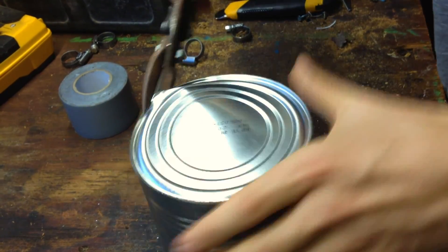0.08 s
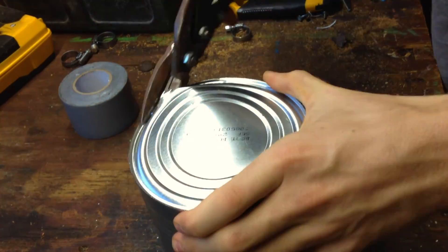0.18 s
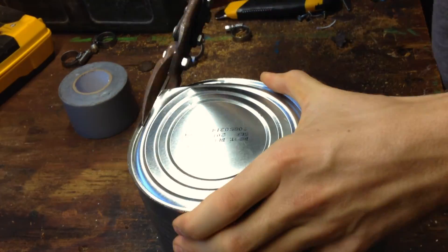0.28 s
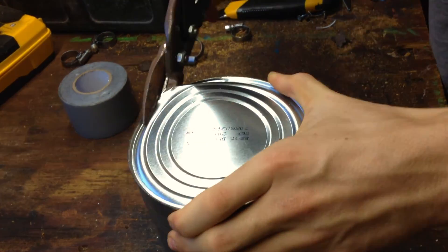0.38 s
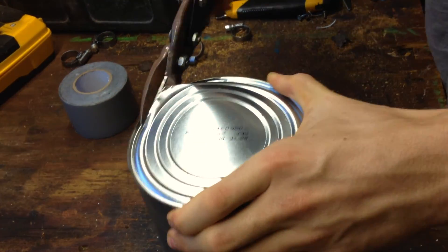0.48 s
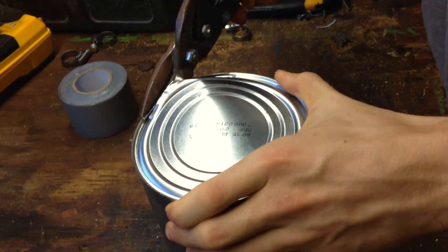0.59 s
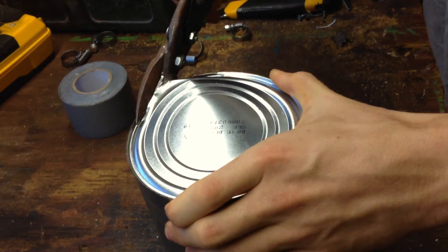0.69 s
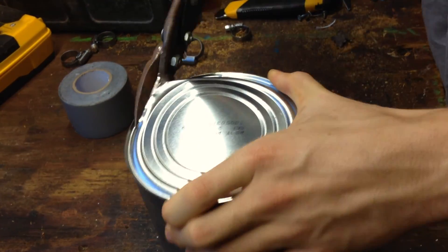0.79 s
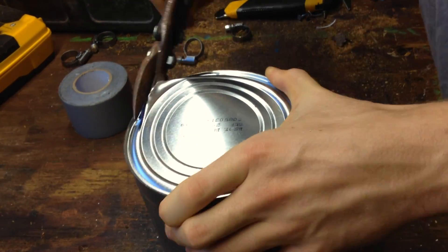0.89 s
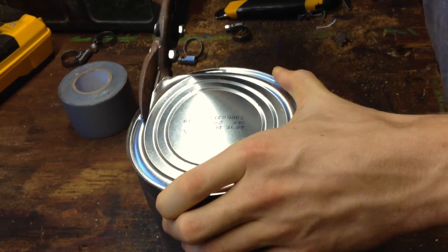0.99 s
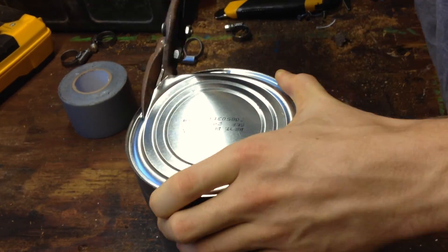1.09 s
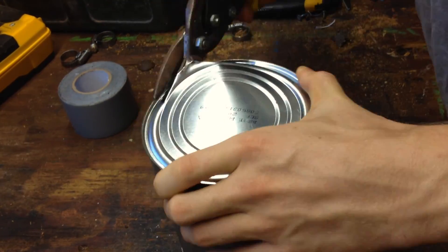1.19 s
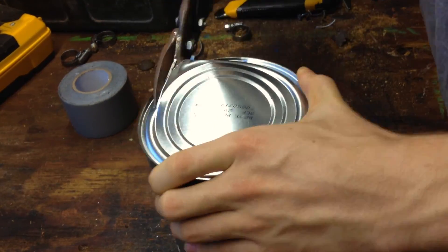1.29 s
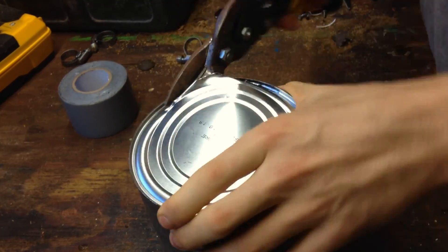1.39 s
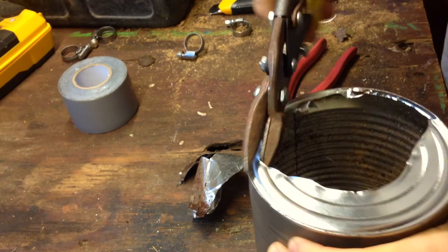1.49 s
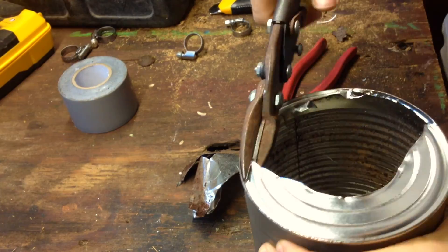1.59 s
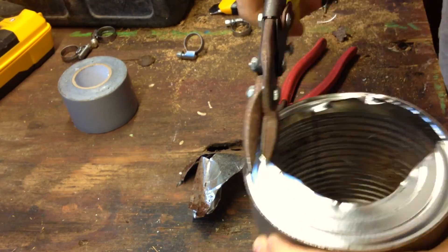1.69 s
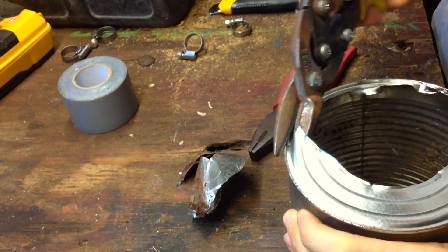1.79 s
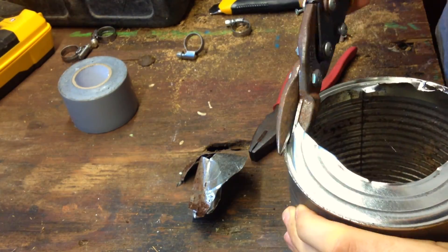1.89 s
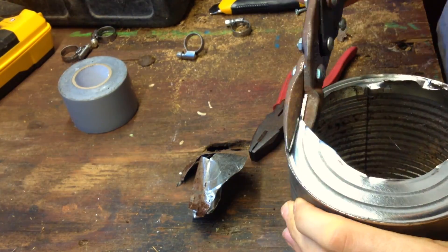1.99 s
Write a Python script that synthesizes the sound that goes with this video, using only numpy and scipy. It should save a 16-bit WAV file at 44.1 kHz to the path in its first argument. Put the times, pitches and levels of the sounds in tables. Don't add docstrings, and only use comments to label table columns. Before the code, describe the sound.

Thin steel can being cut with hand snips: light ticks first, hard bright cracks and tinny buckling through the middle, lighter scraping and ticking at the end; close, dry, little bass, faint short room echo.

```python
import sys
import numpy as np
from scipy import signal
from scipy.fft import rfft, irfft
from scipy.io import wavfile
from scipy.ndimage import uniform_filter1d

SR = 44100
rng = np.random.default_rng(int(sys.argv[2]) if len(sys.argv) > 2 else 0)


def bounce(signal):
    frames = np.transpose(np.atleast_2d(signal))
    limited = np.clip(frames, -1, 1)
    pcm = np.round(limited * 32767).astype(np.int16)
    wavfile.write(sys.argv[1], SR, pcm)


def undo_db(level):
    steps = np.asarray(level, float) / 20
    return 10 ** steps


N = 88200
CHANGE_S = 1.625

# [f/Hz, level/dB]
WALL_BEFORE = [(620, 4), (785, 5.5), (940, -10), (1010, 3.5), (1080, 4.5), (1207, 4), (1320, 1), (1400, 6),
               (1491, 4.5), (1608, -48), (1850, 1), (2070, -4), (2206, -1.5)]
# [f/Hz, level/dB]
WALL_AFTER = [(610, 9), (800, 15), (930, 14.5), (1075, 8.5), (1500, 5.5), (1870, -11), (2050, 8.5)]
RIM_BEFORE = [3870, 5340, 5314, 6980, 8840, 9020, 10810]
RIM_AFTER = [5860, 6180, 7700, 8540, 10250]
# [f/Hz, level/dB]
AIR_COLOUR = [(30, -47), (400, 5), (1000, 3.5), (2000, -3.5), (15000, -37)]

WALL_T60_S, RIM_T60_S = 0.039, 0.029
WALL_OCTAVES, RIM_OCTAVES = 0.23, 0.15
SHEET_DB = 7.5
SLIP_DB = 3.5
TICK_HZ = 5340


def colour(x, points):
    points = np.array(points, float)
    f = np.maximum(np.arange(len(x) // 2 + 1) * SR / len(x), 1)
    level_db = np.interp(np.log(f), np.log(points[:, 0]), points[:, 1])
    return irfft(rfft(x) * undo_db(level_db), len(x))


def unit(x):
    return x / np.sqrt(np.mean(x ** 2))


def fade(t60, size):
    return np.exp(-np.log(1000) * np.arange(size) / SR / t60)


def slow_start(size=3500):
    return (1 - np.exp(-np.arange(size) / SR / 0.00094)) ** 2


def add(out, s, sound, db):
    i = int(max(s, 0) * SR)
    part = sound[:N - i]
    out[i:i + len(part)] += part * undo_db(db) / np.abs(sound).max()


def ring(modes, t60, hz, octaves, chance, size=3500):
    off_db, scatter_db, detune = -12, 2.5, 0.008
    if np.ndim(modes) > 1:
        f, db = np.array(modes, float).T
    else:
        f, db = np.array(modes, float), 0
    near = np.exp(-.5 * (np.log2(f / hz) / octaves) ** 2)
    gain = undo_db(db + off_db * (1 - near) + scatter_db * chance[0, :len(f)])
    f = f * (1 + detune * chance[2, :len(f)])
    waves = np.sin(2 * np.pi * f[:, None] * np.arange(size) / SR)
    return unit(gain @ waves * fade(t60, size))


def slips(rate, spread_db, size):
    u = rng.random((3, size))
    happens = u[0] < rate / SR
    strength = undo_db(-spread_db * np.log(u[1] + 1e-9).clip(-3, 0))
    return happens * strength * np.sign(u[2] - .5)


def sheet(hz, size=3500):
    crack_s, crack_db, hiss_t60_s, patch_db = 0.0006, 17, 0.054, 3.5
    # [f/Hz, level/dB]
    sheet_colour = [(1700, -1), (3000, -6), (9000, -9), (15000, -10)]
    patches = np.c_[np.geomspace(1500, 16000, num=20), patch_db * rng.standard_normal(20)]
    noise = colour(rng.standard_normal(size), [(700, -128), *sheet_colour])
    noise = colour(noise, patches)
    crack = colour(noise, [(hz / 2, -12), (hz, 0), (hz * 2, -12)])
    crack = crack * np.exp(-np.arange(size) / SR / crack_s)
    hiss = unit(noise) * fade(hiss_t60_s, size)
    return unit(hiss + undo_db(crack_db) * crack / np.std(noise))


def rim_body(s, hz, sheet_db):
    modes = [hz, *(RIM_BEFORE if s < CHANGE_S else RIM_AFTER)]
    rim = ring(modes, RIM_T60_S, hz, RIM_OCTAVES, rng.standard_normal((3, 16)))
    return rim + undo_db(sheet_db) * sheet(hz)


def workshop_air():
    return unit(colour(rng.standard_normal(N), AIR_COLOUR))


def scrape():
    grains_per_s, grain_db = 2600, 3.5
    low_db, high_db, walk_db = 1.5, -5.5, 11
    # [t/s, level/dB]
    pressure = [(0, -71.5), (.13, -56), (.29, -65.5), (.46, -55), (.62, -57.5), (.73, -62), (.89, -66),
                (1.02, -65), (1.2, -55), (1.37, -55), (1.55, -53.5), (1.62, -60), (1.75, -50), (2, -70)]
    t, out = np.arange(N) / SR, np.zeros(N)
    hold = SR // 60
    before = (WALL_BEFORE, RIM_BEFORE, t < CHANGE_S)
    after = (WALL_AFTER, RIM_AFTER, t >= CHANGE_S)
    for wall, rim, when in (before, after):
        for low_hz, high_hz in ((800, 2800), (1050, 5400), (1450, 7000), (1900, 9500)):
            steps = np.repeat(rng.standard_normal(N // hold + 1), hold)
            walk = uniform_filter1d(steps, hold)[:N]
            press = undo_db(np.interp(t, *np.array(pressure).T) + walk_db * walk)
            grains = unit(slips(grains_per_s / 4, grain_db, size=N)) * press * when / 2
            chance = rng.standard_normal((2, 3, 16))
            low = unit(ring(wall, WALL_T60_S, low_hz, WALL_OCTAVES, chance[0]) * slow_start())
            hiss = colour(sheet(high_hz), [(high_hz, 0), (2 * high_hz, -10)])
            high = unit(ring(rim, RIM_T60_S, high_hz, RIM_OCTAVES, chance[1]) + undo_db(SHEET_DB) * hiss)
            body = (undo_db(low_db) * low + undo_db(high_db) * high) / np.sqrt(len(low))
            out += signal.fftconvolve(grains, body)[:N]
    return out


def snaps():
    slips_per_s, first_slip_db, snap_db, tick_s = 2500, 9.5, -2.5, 0.0022
    # [t/s, peak level/dB, brightest f/Hz, crunch length/s]
    tears = [(0.0613, -24, 5340, 0.0017), (0.0938, -23.5, 9650, 0.0012), (0.1345, -22, 6860, 0.01),
             (0.199, -16.5, 8300, 0.00067), (0.2096, -6.5, 8440, 0.00067), (0.3209, -12.5, 4800, 0.0015),
             (0.4848, -19.5, 4500, 0.0022), (0.4929, -6.5, 8900, 0.001), (0.497, -12, 5340, 0.0016),
             (0.538, -11, 8500, 0.00087), (0.5722, -9.5, 11100, 0.0011), (0.5828, -8.5, 5560, 0.0018),
             (0.7863, 0.5, 9520, 0.00027), (0.7866, -22.5, 2900, 0.001), (0.839, -22, 8160, 0.0054),
             (0.9292, -11.5, 10960, 0.0016), (0.9297, -6.5, 5760, 0.0039), (1.0966, -1, 10840, 0.00064),
             (1.3274, -13.5, 3800, 0.0045), (1.4144, -19, 3880, 0.013), (1.4209, -10, 3870, 0.0013),
             (1.4395, -3, 7590, 0.0028), (1.5234, -20.5, 3680, 0.0006), (1.54, -18.5, 6900, 0.0023),
             (1.7, -8, 6100, 0.0019), (1.7564, -22.5, 6450, 0.003), (1.8292, -19, 5900, 0.0018),
             (1.8822, -22, 11200, 0.0016), (1.943, -29.5, 6300, 0.0051)]
    # [t/s, peak level/dB]
    ticks = [(0.0298, -37), (0.0421, -24), (0.239, -25.5), (0.3693, -24.5), (0.4683, -28), (0.545, -25),
             (0.6608, -32.5), (0.7192, -27), (0.7292, -26.5), (0.7552, -38), (0.8488, -25.5), (1.039, -46),
             (1.1718, -27), (1.189, -41), (1.2126, -44), (1.2313, -34), (1.314, -21), (1.379, -45),
             (1.3988, -18), (1.494, -40), (1.504, -29), (1.533, -34), (1.583, -38), (1.6334, -52),
             (1.815, -45), (1.8635, -27.5), (1.9914, -33.5)]
    out, t = np.zeros(N), np.arange(1500) / SR
    for s, db, hz, length in list(tears) + [(s, db, TICK_HZ, tick_s) for s, db in ticks]:
        run = slips(slips_per_s, SLIP_DB, size=1500) * np.exp(-t / max(length, .0002))
        run[0] = undo_db(first_slip_db)
        add(out, s, signal.fftconvolve(run, rim_body(s, hz, SHEET_DB)), db + snap_db)
    return out


def pops():
    blip_cycles, pop_db = 1.45, 1
    tail_db, tail_after_db = -9, -6.5
    grit_db, grit_t60_s = -27, 0.0053
    # [peak t/s, peak level/dB, f/Hz]
    early = [(0.0335, -36, 1701), (0.0455, -34, 818), (0.0558, -37, 947), (0.0631, -33, 1033),
             (0.066, -35, 1022), (0.0976, -37, 1001), (0.1125, -31, 958), (0.1333, -33, 1431),
             (0.1365, -30, 1421), (0.1433, -31, 1367), (0.1472, -31, 936), (0.1533, -31, 1141),
             (0.1568, -35, 882), (0.1613, -34, 979), (0.1697, -32, 904), (0.1989, -29, 1227),
             (0.2116, -19, 775), (0.224, -29, 872), (0.2274, -23, 785), (0.2388, -24, 775),
             (0.3073, -43, 1302), (0.323, -15, 1087), (0.3276, -23, 1076), (0.3743, -27, 1108),
             (0.3794, -35, 1927), (0.4001, -30, 1022), (0.4395, -37, 1464), (0.4479, -36, 1076),
             (0.4604, -40, 1119), (0.4705, -27, 1162), (0.4803, -29, 1216), (0.4896, -20, 1248),
             (0.4975, -10, 1259), (0.5033, -22, 1464), (0.5076, -25, 1378), (0.5382, -20, 1227),
             (0.5452, -21, 1442), (0.5739, -26, 1356), (0.5838, -20, 1367), (0.592, -25, 1281),
             (0.5953, -24, 1442), (0.6629, -31, 958), (0.6675, -24, 968), (0.6932, -40, 1356),
             (0.7193, -29, 1012), (0.7228, -31, 1087), (0.7289, -25, 1173), (0.7337, -30, 1033),
             (0.7392, -29, 1184), (0.7598, -29, 1108), (0.7667, -37, 947)]
    # [peak t/s, peak level/dB, f/Hz]
    middle = [(0.788, -9, 1141), (0.7933, -20, 979), (0.8314, -39, 1431), (0.8407, -24, 1238),
              (0.8498, -21, 1216), (0.9173, -43, 1119), (0.922, -40, 1356), (0.9313, -6, 1367),
              (0.9409, -21, 1507), (0.982, -37, 990), (0.9927, -41, 1173), (1.0383, -42, 947),
              (1.0657, -27, 1335), (1.0986, -15, 1388), (1.1019, -19, 1044), (1.1492, -19, 1378),
              (1.1737, -27, 1044), (1.1908, -26, 1065), (1.2163, -34, 1410), (1.235, -26, 1356),
              (1.2545, -24, 1141), (1.258, -20, 1367), (1.2652, -27, 1367), (1.2683, -31, 1453),
              (1.3055, -39, 1044), (1.3163, -20, 1302), (1.3295, -21, 1388), (1.3345, -17, 1324),
              (1.381, -34, 1453), (1.3871, -36, 1087), (1.4006, -18, 893), (1.4159, -14, 1335),
              (1.4196, -18, 1335), (1.4237, -19, 1410), (1.4411, -11, 1367), (1.4447, -12, 1841),
              (1.4696, -28, 1302), (1.4858, -24, 1238), (1.4977, -24, 1248), (1.5049, -27, 1238),
              (1.5126, -28, 1130), (1.5185, -32, 1614), (1.523, -26, 1238), (1.5266, -24, 1453),
              (1.5303, -24, 882), (1.5333, -26, 1335), (1.5429, -31, 958), (1.5684, -35, 818),
              (1.58, -31, 958), (1.5975, -36, 915)]
    # [peak t/s, peak level/dB, f/Hz]
    late = [(1.6324, -42, 925), (1.6485, -34, 1937), (1.6643, -23, 2056), (1.6928, -38, 775),
            (1.7025, -20, 882), (1.7057, -19, 1851), (1.7112, -26, 936), (1.7514, -37, 1421),
            (1.756, -33, 915), (1.7598, -32, 947), (1.7651, -23, 872), (1.7718, -33, 861),
            (1.8036, -41, 925), (1.814, -34, 958), (1.8228, -33, 925), (1.8316, -31, 2099),
            (1.8646, -30, 2067), (1.8836, -28, 2024), (1.9132, -37, 2024), (1.9192, -35, 2034),
            (1.9241, -32, 2056), (1.9443, -32, 2002), (1.9515, -34, 2045), (1.957, -35, 947)]
    # [peak t/s, peak level/dB, f/Hz]
    last = (1.997, -32.5, 1140)
    out, t = np.zeros(N), np.arange(3500) / SR
    for s, db, hz in list(early) + list(middle) + list(late) + [last]:
        before = s < CHANGE_S
        chance = rng.standard_normal((2, 3, 16))
        rise = blip_cycles / hz
        blip = (t / rise * np.exp(1 - t / rise)) ** 3 * np.sin(2 * np.pi * hz * t)
        wall_modes = WALL_BEFORE if before else WALL_AFTER
        rim_modes = RIM_BEFORE if before else RIM_AFTER
        wall = ring(wall_modes, WALL_T60_S, hz, WALL_OCTAVES, chance[0]) * slow_start()
        grit = ring(rim_modes, grit_t60_s, TICK_HZ, RIM_OCTAVES, chance[1]) * slow_start()
        tail = undo_db(tail_db if before else tail_after_db) * wall / wall.max()
        tail = tail + undo_db(grit_db) * grit / grit.max()
        direction = np.sign(chance[0, 1, 0])
        add(out, s - rise, direction * (blip + tail), db + pop_db)
    return out


def room_echo(work):
    echo_db, echo_t60_s = -31.5, 0.061
    tail = unit(colour(rng.standard_normal(12000), AIR_COLOUR) * fade(echo_t60_s, size=12000))
    delayed = np.pad(tail, (200, 0)) / np.sqrt(len(tail))
    return undo_db(echo_db) * signal.fftconvolve(work, delayed)[:N]


def bench(shake):
    t = np.arange(9000) / SR
    hum = sum(np.sin(2 * np.pi * hz * t) * (318 / hz) ** 2 for hz in (318, 485))
    hum = hum * fade(.11, size=9000)
    return undo_db(-43.5) * signal.fftconvolve(shake, hum)[:N]


def rasps():
    slips_per_s, rasp_sheet_db = 4000, -1
    # [peak t/s, peak level/dB, singing f/Hz, swell/s, release/s]
    binds = [(.448, -33, 4900, .003, 0.0014), (0.476, -30, 4540, 0.0037, .003),
             (1.065, -39, 3920, 0.0028, 0.0022), (1.151, -27, 5440, 0.006, 0.00093),
             (1.253, -16.5, 5570, 0.0024, 0.0025), (1.576, -38, 3380, 0.014, 0.0019),
             (1.604, -43, 2650, 0.0023, 0.0029), (1.647, -33.5, 2470, .006, .003),
             (1.662, -15, 9940, 0.0015, .002), (1.753, -32.5, 6200, .008, 0.0048),
             (1.822, -30.5, 3760, 0.0022, 0.0027), (1.921, -31.5, 7390, 0.0036, 0.0017)]
    out, t = np.zeros(N), np.arange(-1500, 1500) / SR
    for s, db, hz, rise, fall in binds:
        run = slips(slips_per_s, SLIP_DB, size=3000) * np.exp(np.minimum(t / rise, -t / fall))
        add(out, s + t[0], signal.fftconvolve(run, rim_body(s, hz, rasp_sheet_db)), db)
    return out


def jolt():
    out, t = np.zeros(N), np.arange(1500) / SR
    push = t * np.exp(-t * 390 * 2 * np.pi)
    add(out, .7865, push, -18)
    return out


def scene():
    air = workshop_air()
    air_db, bench_air_db = -64, -54.5
    work = scrape() + snaps() + pops() + rasps()
    shake = work + undo_db(bench_air_db) * air
    return (work + room_echo(work) + undo_db(air_db) * air + jolt() + bench(shake))[None]


def roll_off(x):
    return signal.sosfilt(signal.butter(12, 16820, fs=SR, output="sos"), x)


def record(dry):
    low_cut_hz, leak_db, top_hz = 569, -14, 15900
    low_cut = signal.butter(7, low_cut_hz, "high", fs=SR, output="sos")
    thin = signal.sosfilt(low_cut, dry) + undo_db(leak_db) * dry
    top_cut = signal.ellip(6, .5, 22, top_hz, fs=SR, output="sos")
    return roll_off(signal.sosfilt(top_cut, thin))


dry = scene()
out = record(dry)
bounce(out)
```